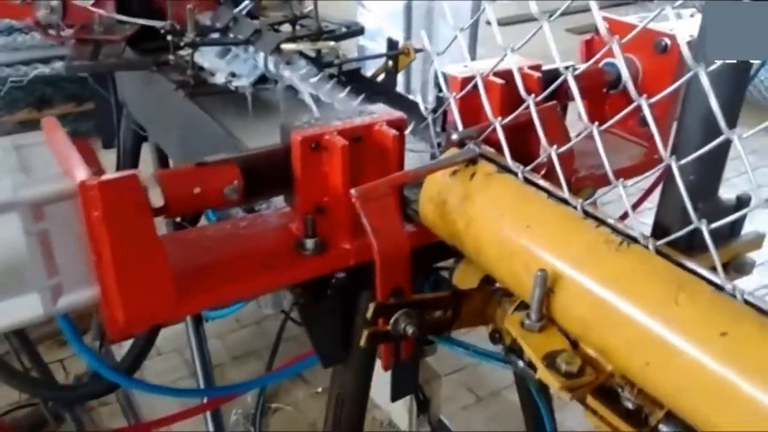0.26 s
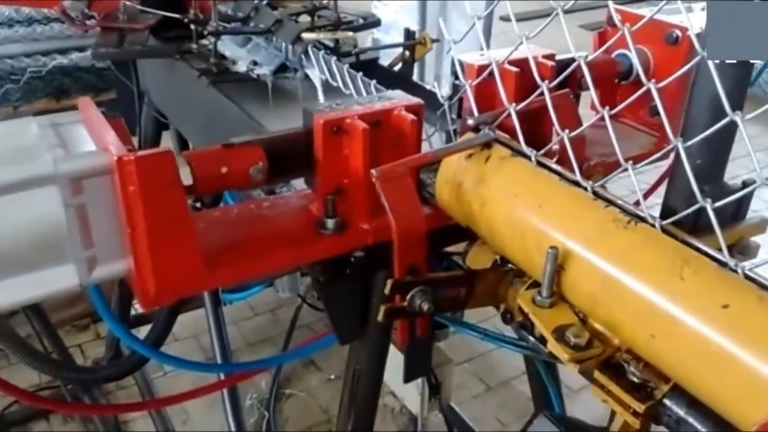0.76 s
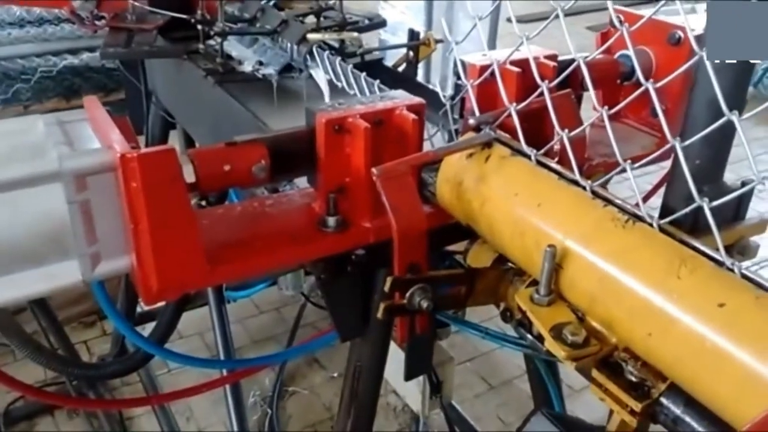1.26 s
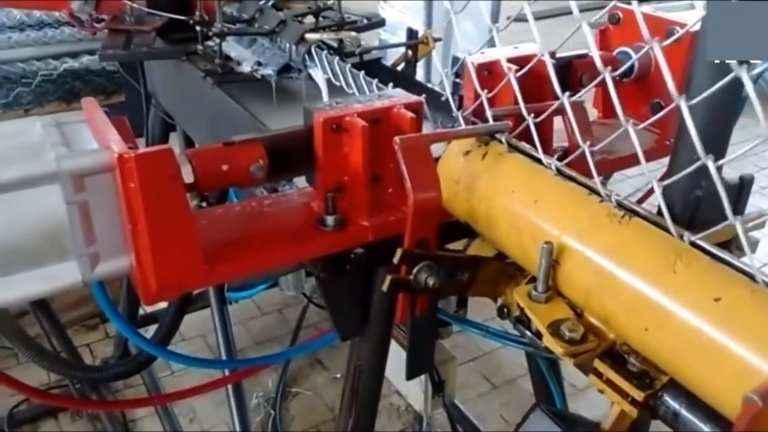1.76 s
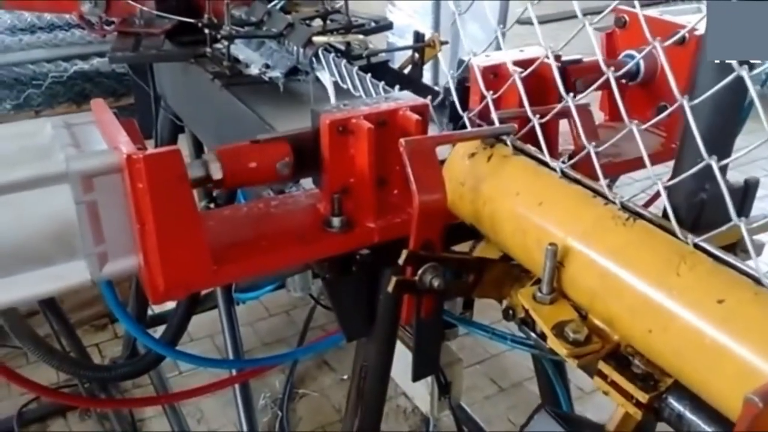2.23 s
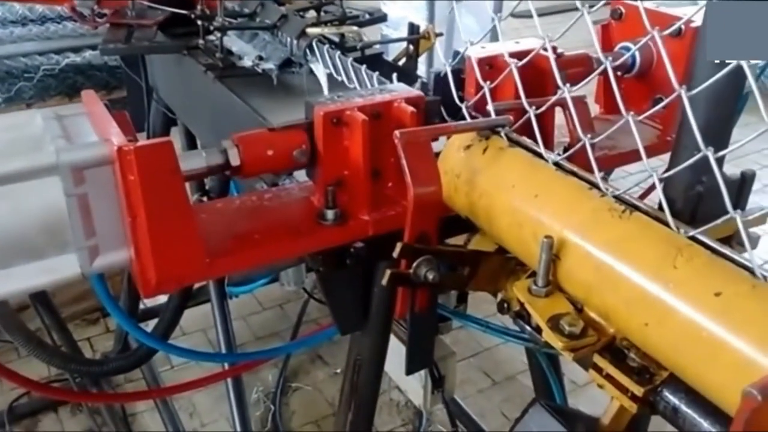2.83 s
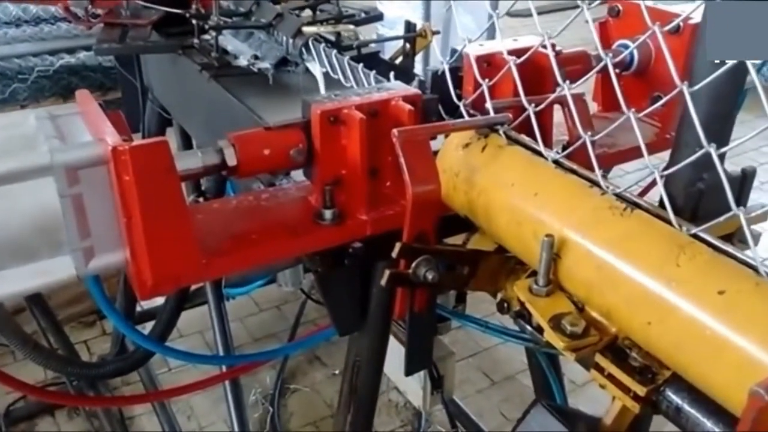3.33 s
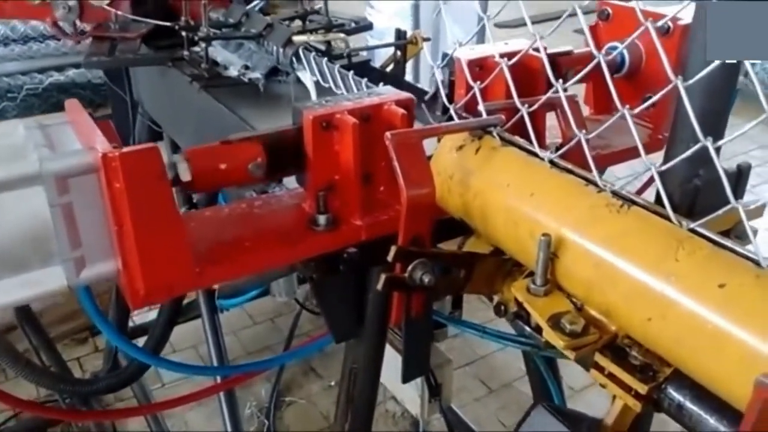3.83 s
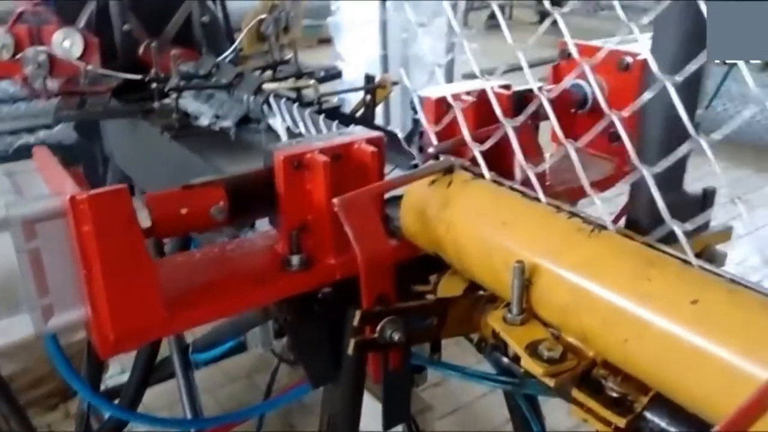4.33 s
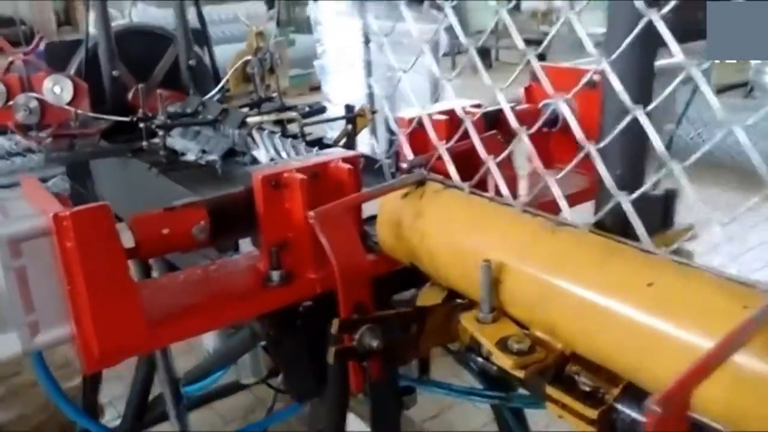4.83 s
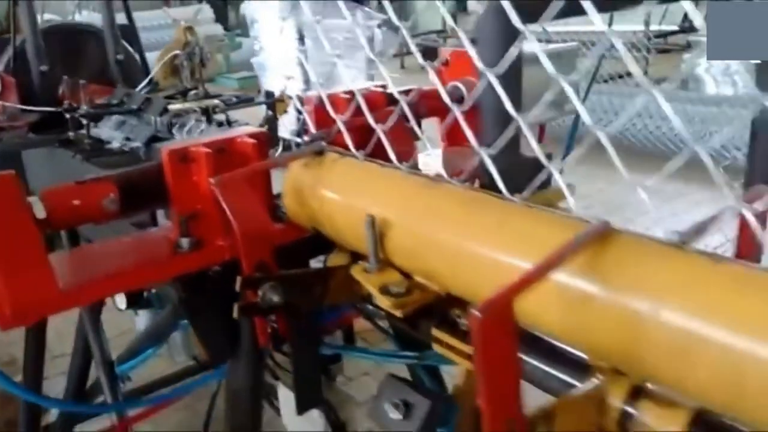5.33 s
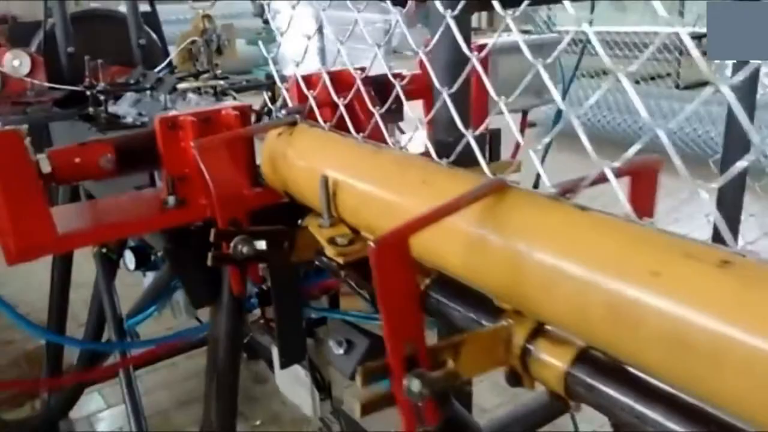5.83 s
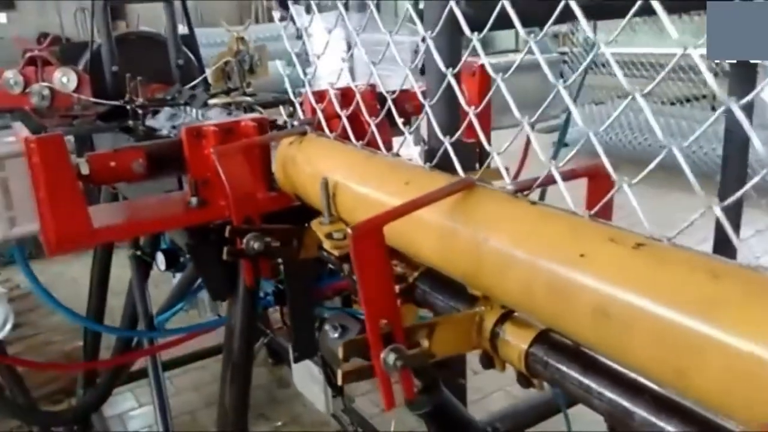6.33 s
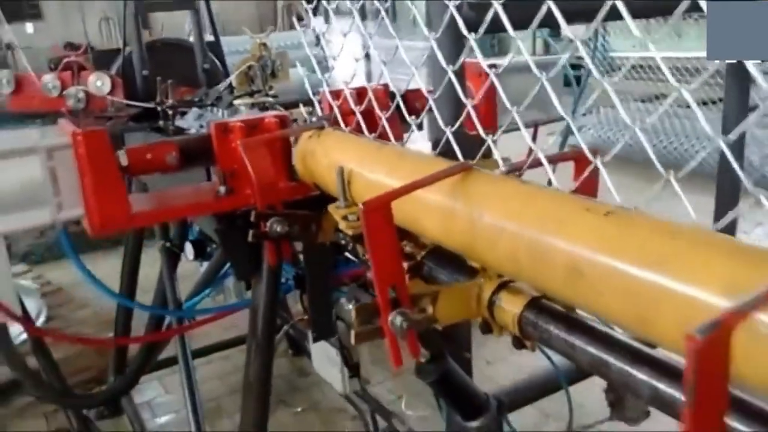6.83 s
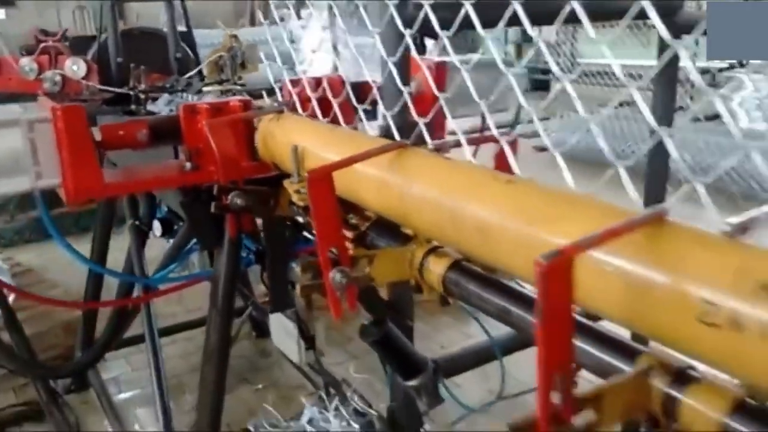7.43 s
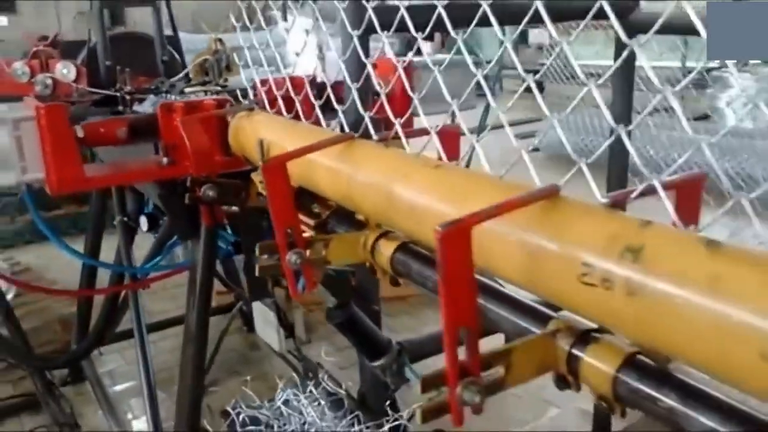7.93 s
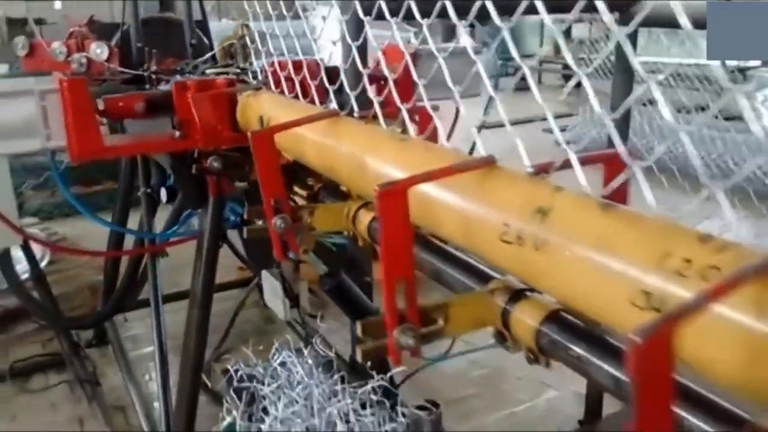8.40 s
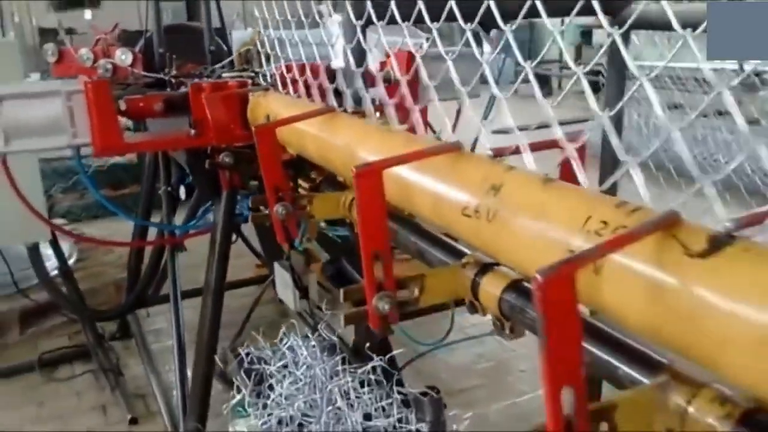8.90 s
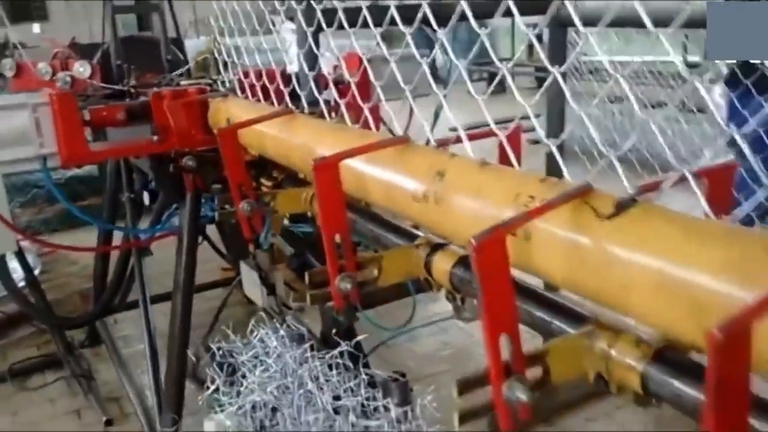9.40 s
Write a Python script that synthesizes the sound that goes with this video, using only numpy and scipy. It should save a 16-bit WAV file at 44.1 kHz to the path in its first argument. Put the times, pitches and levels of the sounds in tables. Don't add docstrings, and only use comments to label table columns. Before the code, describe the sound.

Close wire-mesh weaving machine: hard metal slaps and air jets, a pause with knocks and sighing exhausts, a ringing shear cut, then rapid rhythmic wire slapping.

```python
import sys
import numpy as np
from scipy import signal
from scipy.fft import rfft, irfft, next_fast_len
from scipy.io import wavfile
from scipy.ndimage import uniform_filter1d

SR = 44100
rng = np.random.default_rng(int(sys.argv[2]) if len(sys.argv) > 2 else 0)


def pcm_store(signal):
    levels = np.round(np.clip(np.atleast_2d(signal), -1, 1) * 32767)
    wavfile.write(sys.argv[1], SR, levels.astype(np.int16).T)


def boost_factor(decibels):
    exponent = np.asarray(decibels, float) / 20
    return 10 ** exponent


N = 426006
SIZE = next_fast_len(N)
TIME = np.arange(N) / SR
BINS = np.maximum(np.arange(SIZE // 2 + 1) * SR / SIZE, 1)
PAUSE_S, BLEED_S = 1.246, 0.816

# (time [s], wire drag level [dB], drive load level [dB])
WEAVING = [(3.6, -46, -58), (4.3, -41.5, -35), (4.6, -38, -32), (4.66, -41, -34), (4.84, -43.5, -34),
           (5.3, -36, -27.5), (5.7, -33, -22.5), (5.9, -35.5, -27), (6.18, -32.5, -23.5), (6.6, -34, -26),
           (6.7, -38.5, -29), (7.08, -37, -34), (7.5, -38, -31.5), (8.06, -30.5, -32), (8.4, -37, -32),
           (8.9, -28.5, -30), (9.47, -34, -37.5), (9.66, -30.5, -33)]
# (time [s], blast level [dB], flow level [dB], flow length [s])
EXHAUSTS = [
    (2.059, -23, -27.5, 0.34),
    (3.49, -25.5, -29, 0.37),
]
# (frequency [Hz], level [dB])
DRIVE = [(40, -46), (100, -12.5), (250, -8.5), (600, 0), (1400, -0.5), (2200, -5), (3200, 1.5), (5000, -27),
         (8000, -54)]
# (frequency [Hz], level [dB])
SLAP = [(800, -16), (2000, 1), (3500, 5.5), (5500, 0.5), (8500, -4), (11000, -5), (15000, -18.5)]
# (frequency [Hz], level left [dB])
SUM_DIPS = [(2500, 0), (2780, -12), (3020, -22), (3300, -22), (3480, -8), (3750, 0), (6000, 0), (6500, -11),
            (6900, 0)]


def noise(colour, ripple_db=0., sum_dip=0.):
    hz, db = np.transpose(colour)
    modes = uniform_filter1d(uniform_filter1d(rng.standard_normal(len(BINS)), size=200), size=200)
    shape_db = np.interp(np.log(BINS), np.log(hz), db) + ripple_db * modes / modes.std()
    pair = rfft(rng.standard_normal((2, SIZE))) * boost_factor(shape_db)
    pair -= (1 - boost_factor(sum_dip * np.interp(BINS, *np.transpose(SUM_DIPS)))) * pair.mean(axis=0)
    x = irfft(pair, SIZE)[:, :N]
    return x / x.std()


def flicker(rate_hz, spread_db):
    k = int(SR / rate_hz)
    levels = np.repeat(rng.standard_normal(N // k + 1), k)
    return boost_factor(spread_db * 1.143 * uniform_filter1d(levels, k)[:N])


def ring(x, hz, t60_s):
    pole = np.exp(2j * np.pi * hz / SR - np.log(1000) / (t60_s * SR))
    return signal.lfilter([0, pole.imag], [1, -2 * pole.real, abs(pole) ** 2], x)


def burst(start_s, rise_s, t60_s):
    out, first = np.zeros(N), int(start_s * SR) + 1
    t = TIME[first:first + SR] - start_s
    out[first:first + len(t)] = (1 - np.exp(-t / rise_s)) * np.exp(-np.log(1000) * t / t60_s)
    return out


def strike(force, modes, times_s, scatter_db):
    blow, out = np.searchsorted(times_s, TIME), 0
    for hz, db, t60_s in modes:
        share = boost_factor(db + scatter_db * rng.standard_normal(len(times_s) + 1))
        out = out + ring(share[blow] * force * rng.standard_normal((2, N)), hz, t60_s)
    return out


def thin_sum(x, share):
    lost = 1 - boost_factor(np.interp(BINS, *np.transpose(SUM_DIPS)))
    return x - share * irfft(rfft(x.mean(axis=0), SIZE) * lost, SIZE)[:N]


def slaps():
    # (time [s], peak level [dB], t60 [s], wire
    # mode [Hz])
    wire_hits = [(0.2172, -5, 0.23, 8800), (0.3152, -0.5, 0.089, 5100), (5.482, -15.5, 0.12, 7360),
                 (5.6176, -28, .17, 2500), (5.926, -9.5, 0.079, 8850), (5.9964, -8.5, 0.081, 5800),
                 (6.098, -13, 0.12, 4100), (6.177, -13, 0.11, 5150), (6.271, -8.5, 0.12, 6570),
                 (6.362, -12, 0.069, 5500), (6.4743, -5, 0.066, 9000), (6.5387, -7.5, 0.087, 8700),
                 (6.6212, -1.5, 0.073, 6570), (6.7257, -5.5, 0.13, 7160), (6.811, -8, 0.12, 8280),
                 (6.9125, -8, 0.034, 5650), (6.9843, -3.5, 0.1, 8730), (7.0736, -5.5, 0.15, 8400),
                 (7.1686, -4.5, 0.1, 8900), (7.2645, -4.5, 0.07, 8600), (7.349, -14, 0.22, 4150),
                 (7.4474, -8, 0.15, 6400), (7.5234, -13.5, 0.3, 4200),
                 (7.6321, -9, 0.06, 4260), (7.715, -8, 0.12, 8470), (7.798, -4, 0.12, 3260),
               (7.89, -8, 0.17, 4400), (7.975, -13.5, 0.36, 4120), (8.0694, -21, 0.68, 4260),
               (8.1716, -6.5, 0.067, 5090), (8.256, -6, 0.12, 3140), (8.3447, -5.5, 0.15, 5600),
               (8.4322, -6.5, 0.15, 5600), (8.527, -8, 0.14, 5000), (8.608, -4.5, 0.089, 8770),
               (8.696, -6, 0.16, 5700), (8.7916, -3, 0.13, 5730), (8.878, -3, 0.15, 4260),
               (8.9723, 1, 0.11, 1950), (9.062, -5, 0.16, 4090), (9.1514, -0.5, 0.15, 3240),
               (9.2393, -9, 0.25, 8600), (9.331, -5.5, 0.21, 5800), (9.4272, -4, 0.098, 8470),
               (9.5113, -8.5, 0.13, 7560), (9.6081, -4.5, 0.097, 7870)]
    # (frequency [Hz], level [dB], t60 [s])
    frame = [(585.7, -19, 0.46), (749, -17.5, 0.33), (1636, -19.5, 0.15), (1997, -10.5, 0.081),
             (4150, 0, 0.04), (4420, -11, 0.073), (5120, -7, 0.061), (5606, -3.5, 0.051), (6570, 2, 0.079),
             (7670, -4, 0.06), (8333, 4, 0.028), (8620, -3, 0.051)]
    hits = wire_hits
    bright, body, rings = np.zeros(N), np.zeros(N), np.zeros((2, N))
    rebound_s = .010 + .004 * rng.uniform(-1, 1, len(hits))
    contact_s = .0007
    grit = rng.standard_normal((2, N))
    for (s, db, t60_s, hz), lag_s in zip(hits, rebound_s):
        close = s > 8.1 or s < PAUSE_S
        body_db = (-12.5 if close else -17) + 0.93 * db
        rebound = 3 * t60_s + 0.034 * close
        shape = burst(s - .001, contact_s, t60_s) + rebound * burst(s + lag_s, 3 * contact_s, t60_s)
        bright += boost_factor(db - 11) * shape
        body += boost_factor(body_db - 5) * shape
        near = slice(int(s * SR) - 100, int(s * SR) + SR // 4)
        rings[:, near] += ring(boost_factor(db - 43) * shape[near] * grit[:, near], hz, 0.12)
    chatter = flicker(700, 2.4)
    times_s = np.transpose(hits)[0] - .003
    rings += strike(boost_factor(-28.5) * chatter * bright, frame, times_s, scatter_db=2.5)
    crack = bright * noise(SLAP, ripple_db=5.5)
    thud = body * noise([(150, -30), *DRIVE[3:]], ripple_db=2.5)
    return thin_sum(chatter * (crack + thud) + rings, .95)


def knocks():
    # (time [s], peak level [dB], ring pitch [Hz], ring t60 [s])
    parts = [
        (1.246, -31.5, 4005, 0.22),
        (1.5467, -27, 8300, 0.023),
        (1.658, -23, 1030, 0.048),
        (1.684, -19, 2680, 0.021),
        (2.832, -4, 1320, 0.091),
        (3.473, -28, 6100, 0.045),
        (3.492, -13, 5250, 0.024),
    ]
    # (frequency [Hz], level [dB], t60 [s])
    shear = [(680, -43, 0.73), (1082, -30, 1.8), (1233, -4, 1.8), (1496, 6, 0.4), (1786, 9, 0.19),
             (2195, 0.5, 0.55), (4813, -12, 0.36), (5426, -11, 0.26), (6100, -9, 0.19), (6760, -14, 0.35),
             (7600, 10, 0.12), (8624, -30, 0.48)]
    out, crack = np.zeros((2, N)), noise(SLAP) + 1.17 * noise(DRIVE)
    for s, db, hz, t60_s in parts:
        out += boost_factor(db - 12.5) * burst(s, 0.0016, 0.19) * crack
        out += strike(boost_factor(db - 25.5) * burst(s, 0.0013, 0.12), [(hz, 0, t60_s)], [s], 0)
    cut_s = parts[4][0]
    out += strike(boost_factor(-41.5) * burst(cut_s, 0.0076, 1.25), [(1130, 0, 0.02), (1400, 0, 0.022)], [0], 0)
    return out + strike(boost_factor(-55.5) * burst(cut_s, 0.0036, 0.32), shear, [0], 0)


def ticks():
    # (time [s], peak level [dB], pitch [Hz])
    links = [(.0624, -20, 4200), (.2365, -15, 5630), (.292, -25, 2470), (.3764, -11, 9050),
             (.505, -12, 4200), (.5597, -10.5, 4920), (.612, -15, 4980), (.6657, -26, 4840),
             (1.6124, -31, 4120), (1.683, -15, 5140), (1.74, -16, 5640), (1.795, -24, 4250),
             (1.836, -27, 3950), (5.4226, -21, 3900), (5.805, -13, 3770), (5.8954, -21, 4100),
             (6.372, -13, 4400), (7.056, -17, 4380), (7.087, -17, 4400), (7.11, -20, 8400),
             (7.179, -17, 5270), (7.207, -28, 5600), (7.27, -16, 8660), (7.3704, -25, 4300),
             (7.384, -24, 4440), (7.4545, -27, 4100), (7.477, -29, 4470), (7.9091, -20, 2460),
             (7.988, -11, 5580), (8.064, -16, 4200), (8.104, -12, 4150), (8.184, -16, 5160),
             (8.798, -13, 4190), (8.8904, -19, 4230), (8.9135, -21, 5560), (8.9887, -6, 8400),
             (9.003, -14.5, 1997), (9.072, -12, 4200), (9.165, -21, 4120), (9.253, -8, 8790)]
    out, crack, grit = np.zeros((2, N)), noise(SLAP, sum_dip=0.4), rng.standard_normal((2, N))
    for s, db, hz in links:
        near = slice(int(s * SR) - 50, int(s * SR) + SR // 8)
        shape = boost_factor(db) * burst(s - .001, 0.00043, 0.028)[near]
        out[:, near] += boost_factor(-5.5) * shape * crack[:, near]
        out[:, near] += boost_factor(-22) * ring(shape * grit[:, near], hz, 0.061)
    return out


def buffet():
    # (time [s], length [s], level [dB])
    blasts = [
        (0.218, 0.017, -21),
        (0.379, 0.0064, -17),
        (0.403, 0.09, -12),
        (2.057, 0.018, -41),
        (2.078, 0.1, -16.5),
        (2.835, 0.03, -9.5),
        (3.497, 0.074, -19),
    ]
    # (time [s], level [dB])
    slap_puffs = [(0.243, -13), (0.323, -5.5), (6.815, -32), (6.99, -36), (7.805, -35), (8.445, -28),
                  (8.615, -31), (9.432, -33), (7.091, -25), (7.181, -20), (7.268, -30), (8.722, -20),
                  (8.799, -16), (8.882, -16), (8.977, -5), (9.08, -21), (9.157, -6.5), (9.256, -18),
                  (9.344, -9)]
    # (frequency [Hz], level [dB])
    turbulence = [(20, -41), (60, -10), (120, -1.5), (250, -2), (500, -4.5), (1000, -6.5), (2000, -44)]
    push, swings = np.zeros((2, N))
    puffs = [*slap_puffs, (.506, -12), (2.07, -10), (3.501, -14)]
    for s, length_s, db in blasts:
        gate = np.minimum((TIME - s) / 0.0032, (s + length_s - TIME) / 0.031 + 1)
        push += boost_factor(db + 3) * np.clip(gate, 0, 1)
    for (s, db), (pitch, phase) in zip(puffs, rng.uniform(0, 1, (len(puffs), 2))):
        puff = boost_factor(db + 4.5) * np.exp(-((TIME - s) / 0.0073) ** 2)
        swings += puff * np.sin(2 * np.pi * ((110 + 110 * pitch) * (TIME - s) + phase))
        push += boost_factor(-4.5) * puff
    across, common = push * flicker(80, 0.86) * noise(turbulence)
    across += swings
    return np.array([across, -across]) + boost_factor(-17) * common + boost_factor(-23) * np.roll(swings, SR // 400)


def strokes(rows):
    onset_s, swell_db, sag_db_per_s = 0.0095, 11, 4
    power = np.full(N, 1e-12)
    for s, rise_s, hold_s, db, t60_s in rows:
        t = TIME[int(max(s - onset_s, 0) * SR):] - s
        rise_s = max(rise_s, 1 / SR)
        db = db - swell_db * np.clip(1 - t / rise_s, 0, 1)
        db = db - sag_db_per_s * np.clip(t - rise_s, 0, hold_s)
        db = db - 20 * np.log10(1000) / t60_s * np.maximum(t - rise_s - hold_s, 0)
        power[N - len(t):] += (np.clip(t / onset_s + 1, 0, 1) * boost_factor(db)) ** 2
    return power


def controls():
    # (time [s], rise [s], hold [s], level [dB], release t60 [s])
    vents = [
        (0, 0.00084, 0.16, -35.5, 0.61),
        (.21, 0.2, .02, -25, 0.54),
        (.38, 0.06, 0.0024, -16.5, 0.73),
        (.5, 0.007, 0.054, -30, 1.45),
        (1.25, .004, 0.049, -44, 0.3),
        (1.25, .01, 0.51, -50, .9),
        (1.684, .01, 0.049, -33, 1.9),
        (2.836, 0.0023, .002, -13, 0.086),
        (2.84, .01, 0.044, -26.5, 0.5),
        (3.0, 0.071, 0.53, -53, 0.31),
    ]
    # (time [s], rise [s], hold [s], level [dB], release t60 [s])
    shakes = [
        (0, 0.0011, 0.13, -35.5, 0.55),
        (.21, 0.13, .003, -23.5, .5),
        (.38, 0.043, .003, -18.5, 0.24),
        (.45, 0.015, 0.13, -22, 0.89),
        (1.25, 0.043, 0.0026, -42.5, 0.98),
        (1.68, 0.0033, 0.046, -29, 1.66),
        (2.836, 0.003, .003, -13, 0.11),
        (2.85, .01, 0.043, -27, 1),
        (3.0, .05, .003, -43, 5.4),
    ]
    # (time [s], rise [s], hold [s], level [dB], release t60 [s])
    moves = [(0, 0.0018, 0.18, -31, .5), (.21, .17, .003, -35, .5), (.38, 0.052, 0.0022, -13.5, 0.44),
             (.53, 0.025, 0.04, -29, 0.75), (1.27, 0.033, 0.39, -50.5, .9), (1.57, 0.016, .003, -36, 0.45),
             (1.675, 0.017, 0.35, -29.5, .2), (2.4, 0.12, 0.36, -39.5, .9),
             (2.836, 0.002, 0.017, -10.5, 0.28), (2.87, 0.012, 0.0043, -26, 4.4),
             (3.05, 0.055, .003, -48.5, 5.5)]
    # (time [s], lift [dB])
    snatches = [
        (4.37, 3),
        (4.62, -1),
        (5.415, -2.5),
        (5.715, 3.5),
        (5.787, 7.5),
    ]
    blast = strokes([(s, 0.087, 0, db, 1) for s, db, _, _ in EXHAUSTS])
    flow = strokes([(s, 0, length_s, db, 0.57) for s, _, db, length_s in EXHAUSTS])
    bleed = strokes([(s, 0, BLEED_S, db - 9.5, 0.53) for s, _, db, _ in EXHAUSTS])
    thump = strokes([(s, 0, 0.073, db + 4, 0.17) for s, db, _, _ in EXHAUSTS])
    snatch_db = sum(db * np.exp(-((TIME - s) / 0.034 - .5) ** 2 * 4) for s, db in snatches)
    s, *columns = np.transpose(WEAVING)
    wire, load = (boost_factor(np.interp(TIME, s, c, left=-99) + snatch_db) ** 2 for c in columns)
    slack_db = np.where(TIME < 5.4, 2, -0.8)
    woven = boost_factor(slack_db + 0.57 * snatch_db) ** 2 * wire
    air = strokes(vents) + blast + flow + bleed + wire
    mesh = strokes(shakes) + boost_factor(-8) * flow + bleed + woven
    rumble = strokes(moves) + thump + load
    return (10 * np.log10(p) for p in (air, mesh, rumble))


def hiss(air_db, exhausting):
    # (frequency [Hz], level [dB])
    air_colour = [(60, -55), (120, -43), (250, -45), (500, -21), (1000, -13), (2000, -5), (3500, 0.5),
                  (5500, -2), (8500, 6), (11000, -1.5), (15000, -4)]
    air = noise(air_colour, ripple_db=3.5, sum_dip=1.1)
    dull = signal.sosfiltfilt(signal.butter(2, 10500, fs=SR, output="sos"), air)
    weaving = TIME > EXHAUSTS[-1][0] + BLEED_S
    top_db = 0.2 * (air_db + 20) * (1 - exhausting) - 4.3 * weaving
    return boost_factor(air_db + 5.5) * flicker(30, 1.76) * (dull + boost_factor(top_db) * (air - dull))


def jingle(mesh_db):
    # (frequency [Hz], level [dB])
    mesh_colour = [(500, -34), (1500, 5.5), (2500, 5.5), (4500, 9), (6000, 3), (8000, -6), (12000, -39)]
    grain = flicker(300, 1.8) * flicker(25, 1.5)
    return boost_factor(mesh_db + 1.5) * grain * noise(mesh_colour, ripple_db=3.5, sum_dip=.6)


def rumble(drive_db):
    uneven = flicker(60, 1.3) * flicker(14, 1.3)
    return boost_factor(drive_db - 1.5) * uneven * noise(DRIVE, ripple_db=3, sum_dip=.35)


def singing():
    # (start [s], end [s], frequency [Hz], width [Hz])
    shafts = [(0, .25, 1000, 50), (.52, .85, 220, 14), (1.6, 2.05, 590, 50), (3.95, 5.1, 705, 28),
              (5.08, 5.38, 700, 30), (4.75, 5.5, 1445, 55), (4.4, 5.5, 2050, 60), (.47, .76, 5044, 120),
              (.49, .6, 4250, 150), (5.5, 6.35, 447, 35), (6.3, 6.62, 398, 20), (5.6, 6.58, 1039, 35),
              (6.1, 6.62, 752, 14), (7.7, 9.66, 587, 25), (8.3, 9.5, 1997, 25), (4.35, 5.0, 580, 50),
              (5.6, 5.9, 590, 40), (4.9, 5.8, 280, 80), (2.87, 3.45, 258, 10), (6.6, 7.5, 425, 25),
              (7.4, 8.7, 465, 25), (6.6, 9.3, 749, 6), (5.5, 6.6, 300, 150), (2.9, 3.4, 1300, 90),
              (8.55, 9.4, 590, 20), (4.55, 5.05, 770, 40), (5.65, 6.4, 1400, 50), (.6, 1.0, 1000, 200)]
    shaft_db = [-43, -47, -36, -42.5, -33, -39.5, -40.5, -31.5, -29, -36, -37, -33, -34, -42, -35.5, -41.5,
                -33, -39, -54, -44.5, -44.5, -48, -39, -41.5, -39, -46, -41.5, -42]
    out = np.zeros((2, N))
    for (start_s, end_s, hz, width_hz), db in zip(shafts, shaft_db):
        drag = np.clip(np.minimum(TIME - start_s, end_s - TIME) / .12 + .5, 0, 1)
        t60_s = np.log(1000) / (np.pi * 2.1 * width_hz)
        tone = ring(ring(rng.standard_normal((2, N)), hz, t60_s), hz, t60_s)
        out += boost_factor(db) * drag * tone / tone.std()
    return out


def beds():
    # (frequency [Hz], level [dB])
    shop = [(25, -23), (60, -1), (120, 0), (250, 5.5), (500, 3), (1000, 7.5), (2000, 3), (3500, -3),
            (5500, -4), (8500, -7), (12500, -21), (15000, -12)]
    air_db, mesh_db, drive_db = controls()
    exhausting = sum((TIME > k[0]) & (TIME < k[0] + BLEED_S) for k in EXHAUSTS)
    out = hiss(air_db, exhausting) + jingle(mesh_db) + rumble(drive_db)
    out += boost_factor(-42) * noise(shop, ripple_db=1) + singing()
    first_jets = (air_db > -29) & (TIME < PAUSE_S)
    share = .85 * np.maximum(.8 * exhausting, first_jets)
    share += .55 * (TIME > 5.6176) + .25 * (TIME > 7.6321)
    out = thin_sum(out, uniform_filter1d(share, size=SR // 100))
    return signal.sosfilt(signal.butter(2, 48, "high", fs=SR, output="sos"), out)


def hum():
    # (frequency [Hz], idle level [dB], level added under a -26 dB load [dB])
    lines = [(97, -66.5, -51), (120, -61.5, -50.5), (194, -80, -49)]
    s, _, load_db = np.transpose(WEAVING)
    load = uniform_filter1d(boost_factor(np.interp(TIME, s, load_db, left=-99) + 26), size=SR // 3)
    load = load * np.interp(TIME, [5.9, 6.9], [1, .15])
    out = 0
    for hz, idle_db, busy_db in lines:
        level = (boost_factor(idle_db) + boost_factor(busy_db) * load) * flicker(9, 3.5)
        phase = 2 * np.pi * np.cumsum(hz * flicker(6, 0.079)) / SR
        out = out + level * np.sqrt(2) * np.sin(phase)
    return out


def hall(x):
    bass_t60_s, treble_t60_s, gap_s = 0.76, 1, 0.011
    t = TIME[:SR]
    dense = rng.standard_normal((2, SR))
    bass = uniform_filter1d(dense, size=9)
    tail = bass * np.exp(-np.log(1000) * t / bass_t60_s)
    tail += (dense - bass) * np.exp(-np.log(1000) * t / treble_t60_s)
    tail *= np.clip(t / gap_s - 1, 0, 1)
    return signal.fftconvolve(x, tail / np.sqrt(np.sum(tail ** 2) / 2), axes=1)[:, :N]


def scene():
    hits = slaps() + knocks() + ticks()
    return hits + buffet() + beds() + hum() + thin_sum(boost_factor(-10.5) * hall(hits), .85)


def top_cut(x):
    return signal.sosfilt(signal.butter(12, 15600, fs=SR, output="sos"), x)


def record(dry):
    # (frequency [Hz], difference minus sum level [dB])
    matrix = [(100, -5), (1000, -13), (1500, -17.5), (2300, 0), (3050, 0.5), (4350, -5), (4700, -9),
              (5050, -3.5), (6400, 4), (8050, -3.5), (9600, 2), (11500, -0.5), (12900, -10), (13400, 12),
              (14200, 11), (14700, -4)]
    in_step_hz, comb_hz = 1560, 3140
    ratio = boost_factor(np.interp(BINS, *np.transpose(matrix)))
    total, apart = rfft(dry[0] + dry[1], SIZE), rfft(dry[0] - dry[1], SIZE)
    share = np.interp(BINS, [comb_hz, 2 * comb_hz], [.45, .85])
    share = share * np.sin(2 * np.pi * (in_step_hz - BINS) / comb_hz)
    share *= (BINS > in_step_hz) & (BINS < in_step_hz + 2.5 * comb_hz)
    apart = np.sqrt(1 - share ** 2) * apart + 1j * share * total
    scale = np.sqrt(2 + 2 * ratio ** 2)
    mid = irfft(total / scale, SIZE)[:N]
    side = irfft(apart * ratio / scale, SIZE)[:N]
    pair = np.array([mid + side, mid - side])
    pair = pair / (1 + (pair / .97) ** 8) ** (1 / 8)
    pair = signal.sosfilt(signal.ellip(8, .2, 70, 15500, fs=SR, output="sos"), pair)
    return top_cut(np.clip(pair, -1, 1))


dry = scene()
out = record(dry)
pcm_store(out)
```